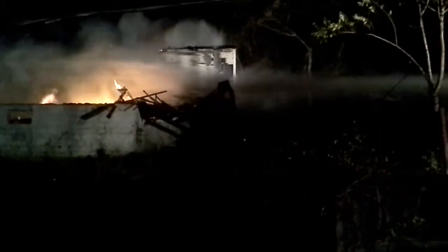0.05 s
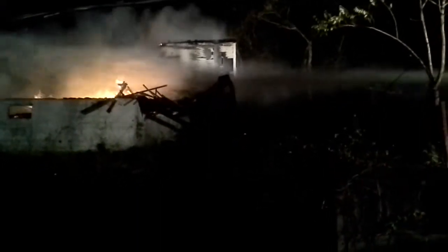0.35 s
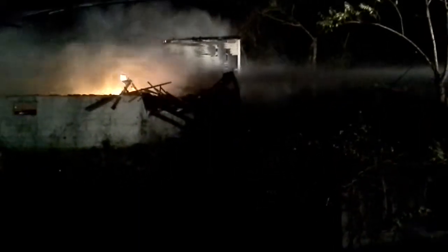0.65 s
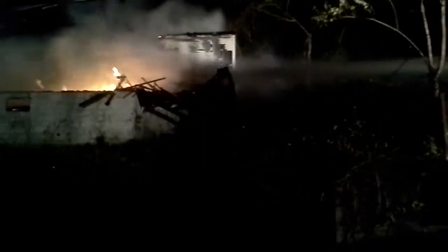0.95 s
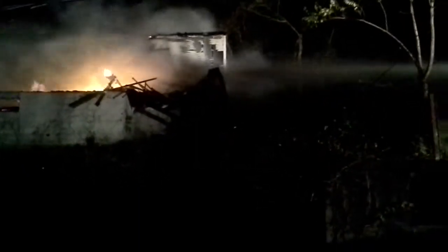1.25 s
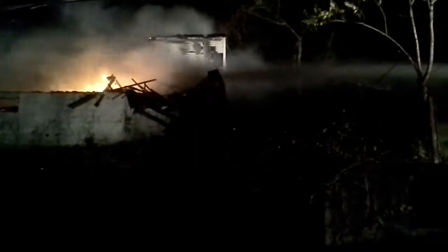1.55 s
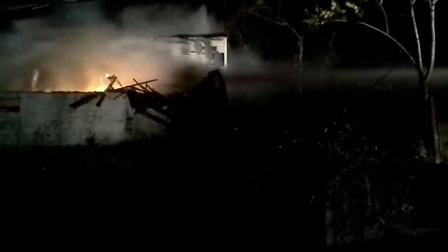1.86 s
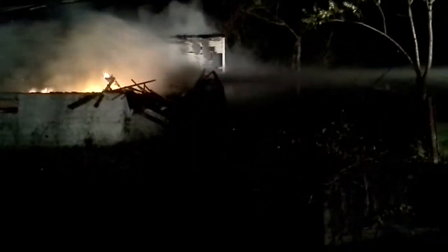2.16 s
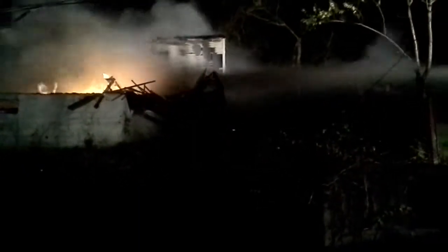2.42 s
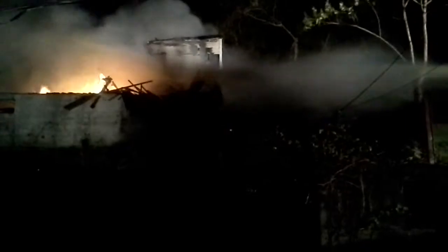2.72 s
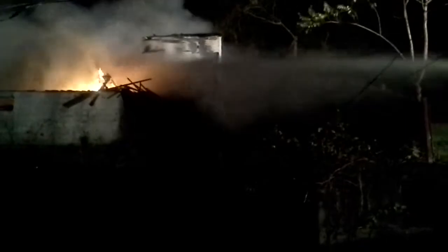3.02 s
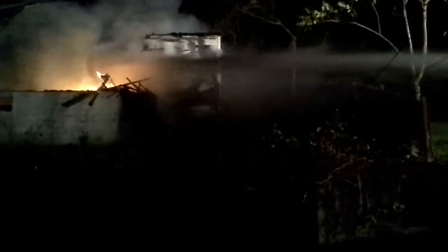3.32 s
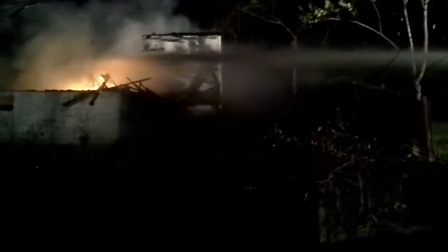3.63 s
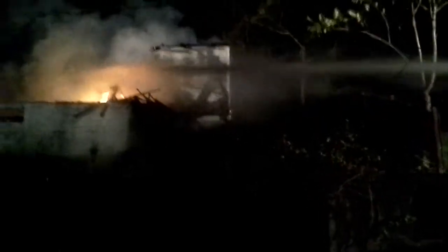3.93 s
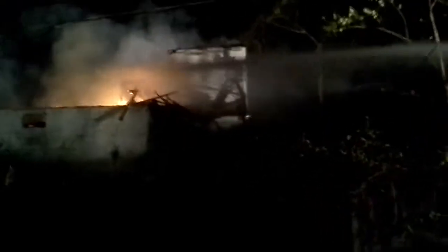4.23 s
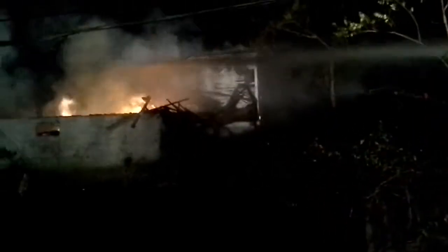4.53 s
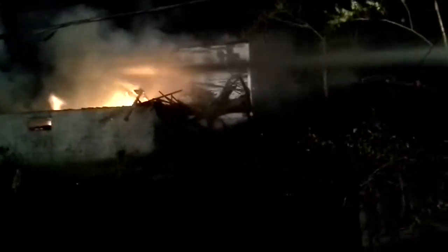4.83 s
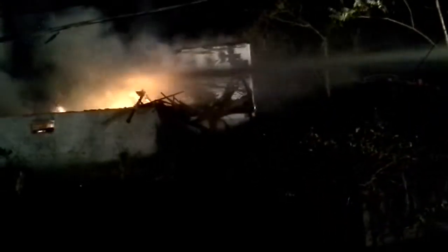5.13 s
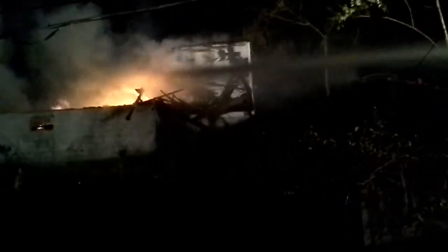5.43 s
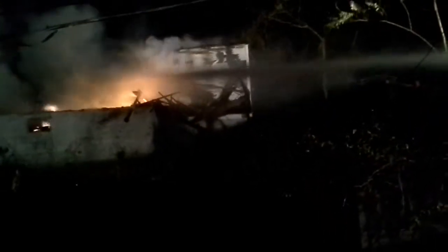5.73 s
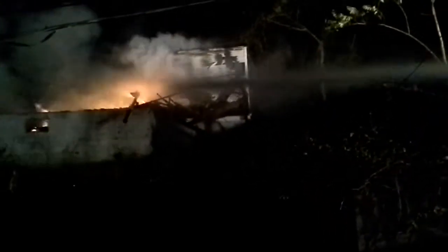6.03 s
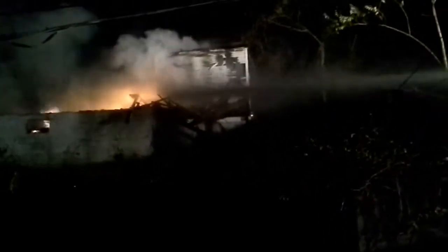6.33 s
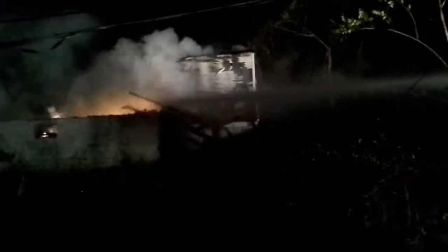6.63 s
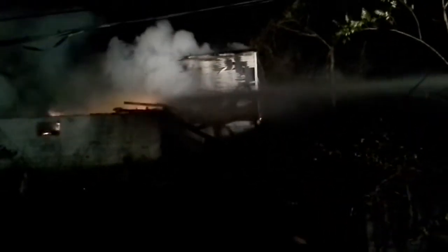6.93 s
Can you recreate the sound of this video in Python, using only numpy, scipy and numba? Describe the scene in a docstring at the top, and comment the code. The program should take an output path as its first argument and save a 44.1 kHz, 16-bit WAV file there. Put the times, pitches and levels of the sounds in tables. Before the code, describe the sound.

Outdoors, a powerful water jet hits a wall with hollow drumming and bright splashing, over the low hum and faint gear whine of a pump engine slightly to the left. The pounding peaks and stops abruptly just before halfway. The engine then stands out against hissing mist, with one brief splash, and speeds up slightly before a last cluster of sharp splashes. The microphone adds a slight treble ring.

```python
"""A fire pump's engine drones off to the left while its hose jet drums and splashes on a burning building.
The jet lifts over the roof, leaving the hiss of spray and stray drops, then grazes and slaps it again.
The drone is a stack of exhaust harmonics with gear whine and rumble; the water is dense showers of tiny
impacts. The microphone rings near 9 kHz and its limiter ducks the drone when the water strikes hard."""
import sys
import numpy as np
from scipy import signal
from scipy.fft import rfft, irfft
from scipy.io import wavfile
from scipy.ndimage import map_coordinates
from numba import njit

SR = 44100
rng = np.random.default_rng(int(sys.argv[2]) if len(sys.argv) > 2 else 0)


def waveform_to_disk(signal):
    """Save audio, clipped to [-1, 1], as 16-bit WAV at the path in sys.argv[1]."""
    frames = np.transpose(np.atleast_2d(signal))
    scaled = np.clip(frames, -1, 1) * 32767
    samples = np.round(scaled).astype(np.int16)
    wavfile.write(sys.argv[1], SR, samples)


N = 307377
TIME, FREQ = np.arange(N) / SR, np.arange(N // 2 + 1) * SR / N


def undb(db):
    """Decibels to gain."""
    return 10 ** (np.asarray(db) / 20)


def unit(x):
    """Scale to rms 1."""
    return x / np.sqrt(np.mean(x ** 2))


def curves(table):
    """One automation curve for each column after a table's time column."""
    times, *columns = np.transpose(table)
    return [np.interp(TIME, times, column) for column in columns]


def colour(x, spectrum):
    """Equalise a sound through (f/Hz, level/dB) points, then scale to rms 1."""
    hz, db = np.transpose(spectrum)
    gain = undb(np.interp(np.log(FREQ + 1), np.log(hz), db))
    return unit(irfft(rfft(x) * gain, N))


def walk(rate_hz):
    """Smooth random wandering up to about rate_hz, at rms 1."""
    return unit(irfft(rfft(rng.standard_normal(N)) * np.exp(-(FREQ / rate_hz) ** 2), N))


def delay(x, ms):
    """The sound a fixed or moving time later."""
    return map_coordinates(x, [np.arange(N) - ms * SR / 1000], order=3, mode="wrap")


def echo(pair, ms):
    """A reflection: both channels arrive again later."""
    return np.array([delay(side, ms) for side in pair])


def ports(noises, lag_ms, diffuse_hz, left_db):
    """Three noises at two microphone ports: lows come direct, right lagging; highs from all sides."""
    direct, scattered = noises[0], noises[1:]
    direct_share = 1 / (1 + FREQ / diffuse_hz)
    pair = np.array([direct, delay(direct, lag_ms)])
    blend = rfft(pair) * np.sqrt(direct_share) + rfft(scattered) * np.sqrt(1 - direct_share)
    return irfft(blend, N) * undb([[left_db / 2], [-left_db / 2]])


def drops(per_s, scatter_db):
    """Three unrelated showers of impacts of uneven size."""
    hits = np.sqrt(rng.poisson(per_s / SR, (3, N)))
    return unit(hits * rng.standard_normal((3, N)) * undb(scatter_db * rng.standard_normal((3, N))))


def together(*gains):
    """The joint strength of unrelated showers: their powers add."""
    return np.sqrt(sum(gain ** 2 for gain in gains))


def strikes(table, attack_s, fade_s):
    """The envelope of a run of hits: each rises, holds to the end of its length and dies away."""
    bursts = []
    for start_s, length_s, db in table:
        age = TIME - start_s
        rise = np.clip(age / attack_s, 0, 1)
        fade = np.exp(-np.maximum(age - length_s, 0) / fade_s)
        bursts.append(undb(db) * rise * fade)
    return together(*bursts)


@njit
def follower(peak, attack_s, release_s):
    """The limiter's envelope: it chases peaks up at the attack rate and sinks at the release rate."""
    attack, release = 1 / (1 + attack_s * SR), 1 / (1 + release_s * SR)
    envelope, level = np.empty(len(peak)), 2 * peak[:500].mean()
    for i in range(len(peak)):
        level += (peak[i] - level) * (attack if peak[i] > level else release)
        envelope[i] = level
    return envelope


def spray():
    """The nozzle and the falling mist hiss steadily."""
    # bright EQ of the mist: f/Hz, level/dB
    hiss_eq = [(300, -26), (1200, -14.5), (2100, -16.5), (2700, -10.5), (4000, -10.5), (5800, -13.5),
               (8000, -5.5), (10000, -5), (14000, -13)]
    mist = ports(drops(per_s=40000, scatter_db=0), lag_ms=.35, diffuse_hz=590, left_db=3)
    return colour(mist, hiss_eq) * undb(-19.5 + 0.12 * walk(11) + 0.32 * walk(40))


def pump():
    """The exhaust drones on its sixth harmonic and throbs once a cycle; gears whine, the casing rumbles."""
    # engine speed, and how loud the drone is heard, held down while the water strikes:
    # t/s, cycle rate/Hz, heard level/dB
    drone = [(0, 33.4, -12), (2.5, 33.3, -8), (4.0, 33.25, -7.5), (4.9, 33.35, -7.5), (5.1, 33.93, -9.5),
             (5.5, 33.79, -8.5), (6.4, 34.13, -10), (6.97, 33.74, -9)]
    # exhaust note: multiple of the cycle rate, level/dB
    harmonics = [(3, -26), (4, -25), (5, -19), (6, -0.5), (7, -40), (8, -17.5), (9, -20.5), (10, -22.5),
                 (11, -26), (12, -16), (13, -40.5), (14, -31.5), (15, -31.5), (21, -35), (22, -31.5),
                 (23, -48), (25, -37), (26, -44), (28, -32.5), (30, -39), (43, -38)]
    # pump and gear tones: multiple of the cycle rate, level/dB, rise with cycle rate/(dB per Hz)
    gear_tones = [(10.76, -23, 5), (28.63, -32.5, -3), (50, -42.5, 17), (51, -45, 8), (77.3, -38.5, 11)]
    # EQ of the casing: f/Hz, level/dB
    rumble_eq = [(25, -33), (55, -25.5), (95, -10), (170, -7), (230, -1.5), (345, 1), (410, -7.5),
                 (600, -13), (930, -12.5), (1200, -20), (1700, -18.5), (2200, -23.5), (5000, -42)]
    cycle_hz, heard_db = curves(drone)
    phase = 2 * np.pi * np.cumsum(cycle_hz * (1 + 0.00084 * walk(12))) / SR
    # the harmonics line up in one push and pull a cycle; the weak ones waver most
    exhaust = -np.sqrt(2) * sum(undb(db - db * 0.035 * walk(2.9)) * np.sin(k * phase)
                                for k, db in harmonics)
    exhaust = np.array([exhaust, delay(exhaust, ms=0.37)])  # from the left: the right port hears it later
    speedup_hz = cycle_hz - cycle_hz[0]
    whine = np.sqrt(2) * sum(undb(db + rise * speedup_hz + 2 * walk(2.2)) * np.sin(k * phase)
                             for k, db, rise in gear_tones)
    throb = rng.standard_normal((3, N)) * (1 + 0.073 * np.cos(phase))
    rumble = colour(ports(throb, lag_ms=0.32, diffuse_hz=2000, left_db=-3.7), rumble_eq)
    return undb(heard_db + .5) * (exhaust + whine + undb(-14.5) * rumble)


def aim():
    """Envelopes of drumming, boom, coarse and fine drops as the jet holds, slaps, grazes and rains down."""
    # jet held on the wall: t/s, drumming/dB, splash/dB, boom over drumming/dB, coarse over fine drops/dB
    on_wall = [(0, -7.5, -1.8, -3.5, -1.5), (.7, -5.8, 0.5, -4, -2.5), (1.45, -5, 1.3, -4, 0),
               (1.7, -4, 4, -2, -1.5), (2.05, -6.5, 2.5, -0.5, 0), (2.45, -8.3, 5, -2.5, 2),
               (2.57, -12, 2.5, -2.5, -0.5), (2.9, -13, 1.6, -13, -3)]
    # the solid stream slaps the building: t/s, length/s, drumming/dB
    slaps = [(1.568, 0.038, -5.5), (2.645, 0.055, -1.5), (2.72, 0.12, -2.5), (2.885, 0.027, -9),
             (2.932, 0.017, -6), (6.485, 0.066, -6)]
    # the jet's fringe grazes the building and sizzles: t/s, length/s, splash/dB
    grazes = [(3.24, .04, -14), (3.75, .065, -5), (3.83, 0.12, -12), (4.455, .025, -14), (6.175, .03, -13),
              (6.295, 0.021, -5.5), (6.335, 0.061, -7), (6.43, 0.12, 1.5), (6.572, .03, 2.5),
              (6.63, .06, -5.5), (6.712, .045, -1), (6.885, 0.069, -9.5)]
    drum_db, splash_db, boom_db, coarse_db = curves(on_wall)
    lift_off_s, lift_fade_s = 2.96, 0.011
    held = np.exp(-np.maximum(TIME - lift_off_s, 0) / lift_fade_s)
    held *= 1 - 0.72 * np.exp(-((TIME - 1.555) / 0.01) ** 2)  # the stream parts for a moment
    slap = strikes(slaps, attack_s=0.019, fade_s=0.026)
    graze = strikes(grazes, attack_s=0.017, fade_s=0.036)
    stray_thud, stray_splash = undb(-32.5), undb(-20.5)  # stray water keeps raining on the ruin
    drum = together(held * undb(drum_db), slap, graze * undb(-22), stray_thud)
    boom = together(held * undb(drum_db + boom_db), slap * undb(-11), stray_thud)
    even_splash = together(slap * undb(8), stray_splash)  # as much coarse as fine
    coarse = together(held * undb(splash_db + coarse_db / 2), graze * undb(-2.25), even_splash)
    fine = together(held * undb(splash_db - coarse_db / 2), graze * undb(2.25), even_splash)
    return drum, boom, coarse, fine


def jet():
    """Slugs of water drum on the wall and burst into drops; ground and wall echoes hollow the sound."""
    # midrange knock of water on the wall: f/Hz, level/dB
    drum_eq = [(200, -37), (390, -19), (520, 1), (800, 1), (1050, -3), (1400, 0), (2000, -6), (2800, -7.5),
               (5000, -16.5), (12000, -63)]
    # low body of the wall: f/Hz, level/dB
    boom_eq = [(40, -52), (150, -2.5), (230, 5.5), (280, 8.5), (350, 5.5), (430, -6), (700, -26.5)]
    # bright burst of drops: f/Hz, level/dB
    splash_eq = [(500, -17), (1500, -11.5), (3200, -3.5), (4800, -3.5), (5900, -7.5), (7200, -1.5),
                 (9500, 1.5), (11000, -5), (14000, -7.5)]
    ground_echo_ms, wall_echo_ms = 3.88, 1.9
    drum, boom, coarse, fine = aim()
    slugs = ports(drops(per_s=7000, scatter_db=1), lag_ms=-0.048, diffuse_hz=4500, left_db=-2.5)
    beads = ports(drops(per_s=35000, scatter_db=1), lag_ms=-0.022, diffuse_hz=5500, left_db=4)
    # the stream breaks up unevenly in flight, so the blows surge
    wall = boom * colour(slugs, boom_eq) * undb(1.1 * walk(23))
    wall += drum * colour(slugs, drum_eq) * undb(1.7 * walk(26))
    wall += 0.46 * echo(wall, ground_echo_ms * (1 + 0.015 * walk(5.9)))
    splash = colour(beads, splash_eq)
    splash += 0.11 * echo(splash, wall_echo_ms) + 0.088 * echo(splash, ground_echo_ms)
    # big drops patter below 6 kHz, fine ones sizzle above
    patter = signal.sosfiltfilt(signal.butter(2, 6000, fs=SR, output="sos"), splash)
    sizzle = splash - patter
    splash = coarse * patter + fine * sizzle
    return wall * undb(-7.5) + splash * undb(-9.5 + 0.87 * walk(60))


def scene():
    """The jet plays over a bed of pump drone and spray."""
    return pump() + spray() + jet()


def record(dry):
    """The microphone rings in the treble; a limiter ducks peaks, the rest clips, and the top is cut."""
    ring_hz, ring_width_hz, ring_db = 8640, 890, 4
    top_hz, threshold = 14550, .92
    ring = 1 + (undb(ring_db) - 1) / (1 + (2 * (FREQ - ring_hz) / ring_width_hz) ** 2)
    sound = irfft(rfft(dry) * ring * (FREQ < top_hz), N)
    peak = follower(np.abs(sound).max(axis=0), attack_s=.0005, release_s=.07)
    limited = np.clip(sound * np.minimum(1, threshold / peak), -1, 1)
    return signal.sosfiltfilt(signal.ellip(10, .1, 60, top_hz, fs=SR, output="sos"), limited)


dry = scene()
out = record(dry)
waveform_to_disk(out)
```